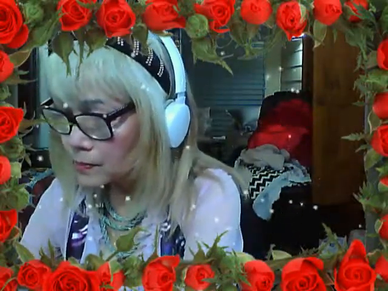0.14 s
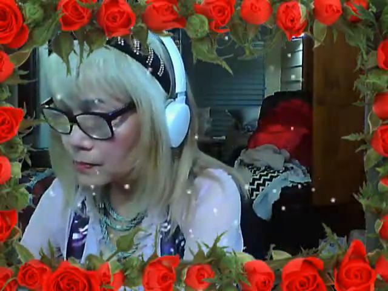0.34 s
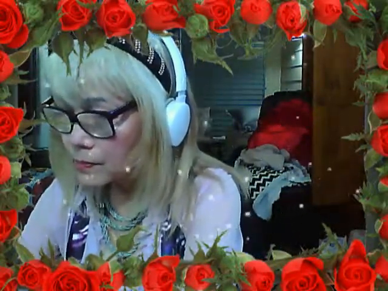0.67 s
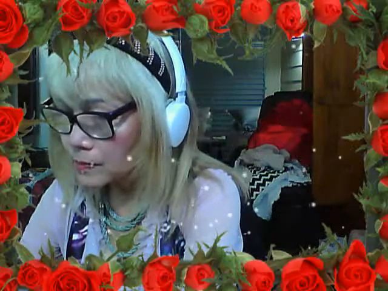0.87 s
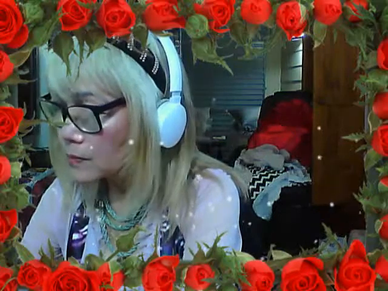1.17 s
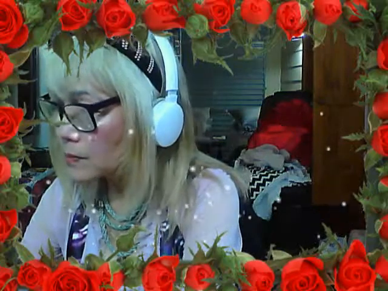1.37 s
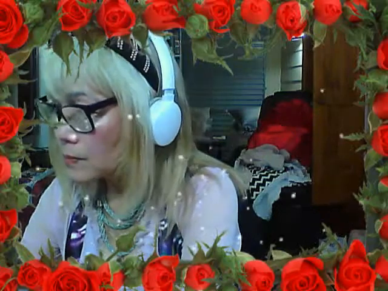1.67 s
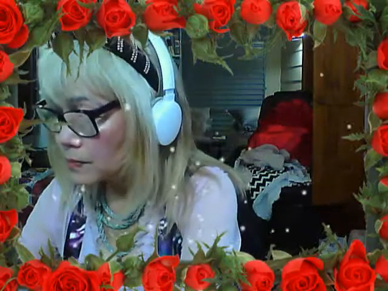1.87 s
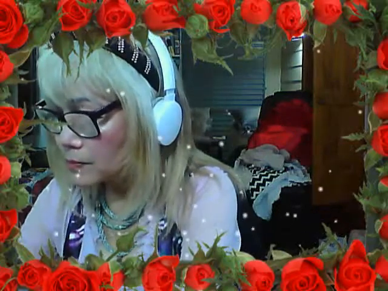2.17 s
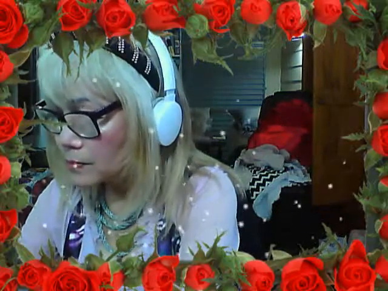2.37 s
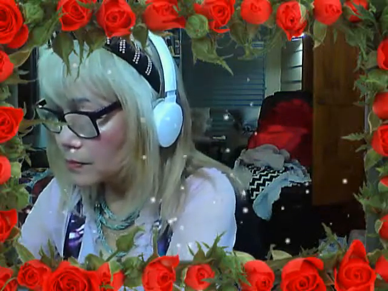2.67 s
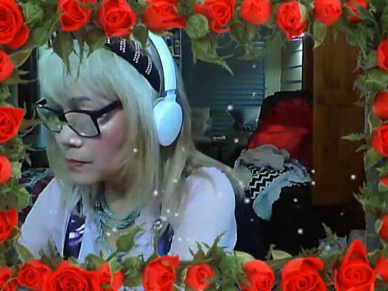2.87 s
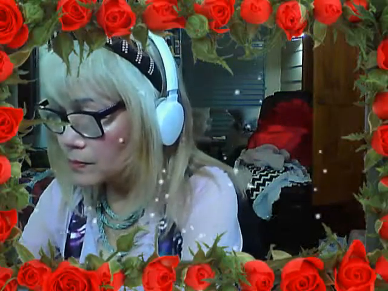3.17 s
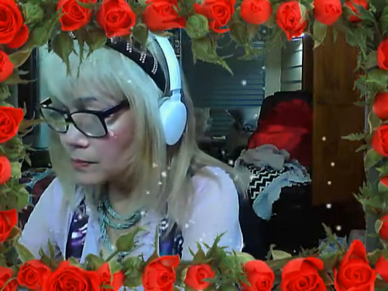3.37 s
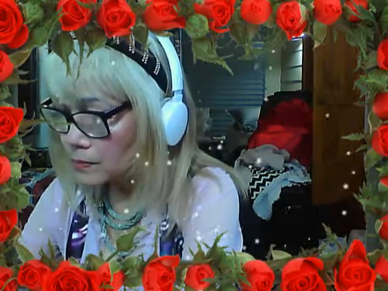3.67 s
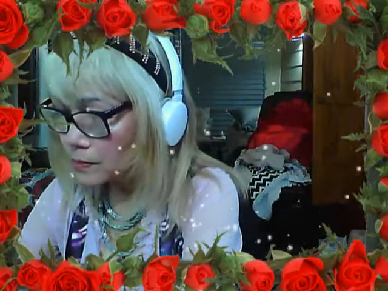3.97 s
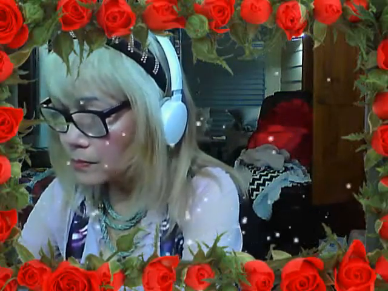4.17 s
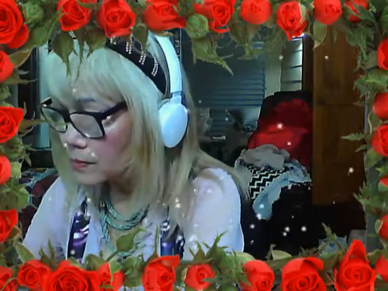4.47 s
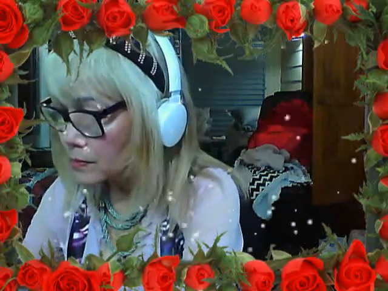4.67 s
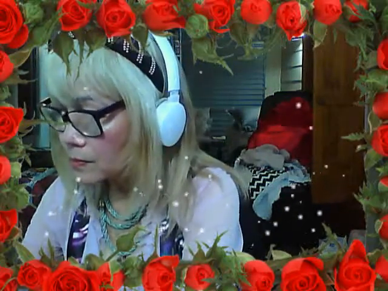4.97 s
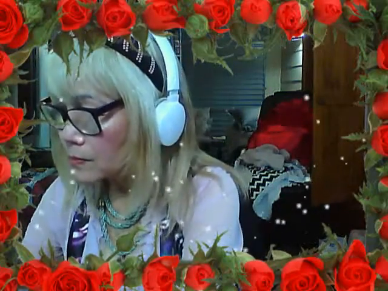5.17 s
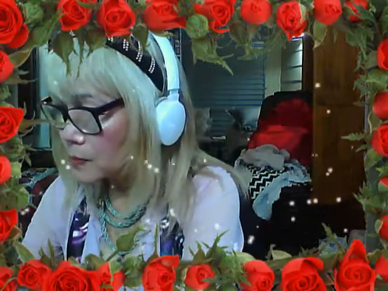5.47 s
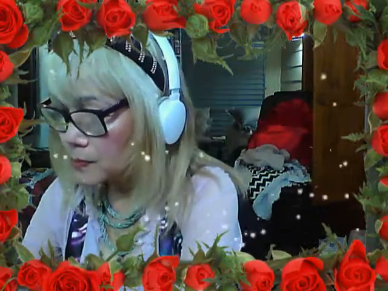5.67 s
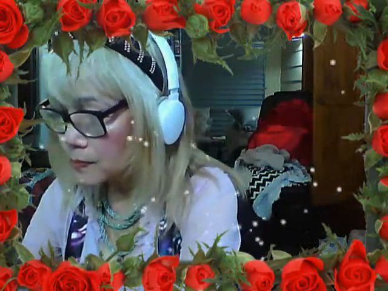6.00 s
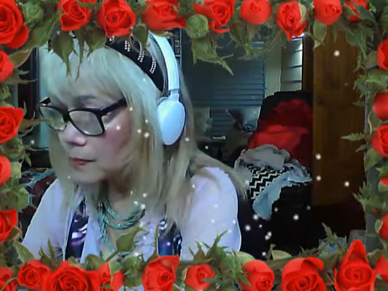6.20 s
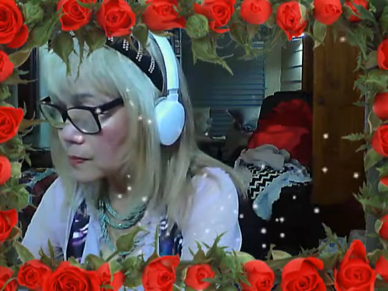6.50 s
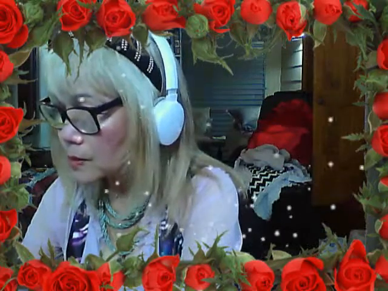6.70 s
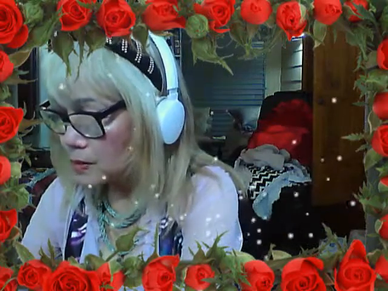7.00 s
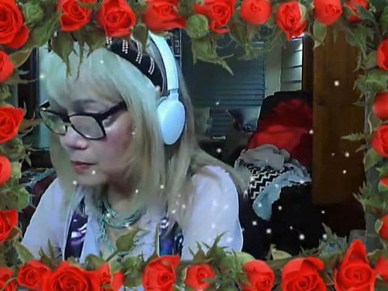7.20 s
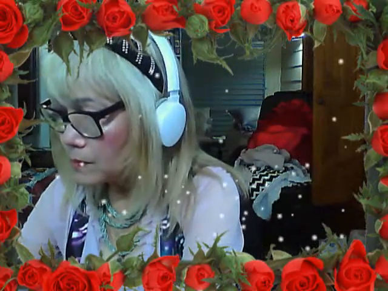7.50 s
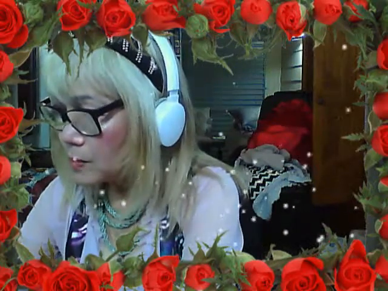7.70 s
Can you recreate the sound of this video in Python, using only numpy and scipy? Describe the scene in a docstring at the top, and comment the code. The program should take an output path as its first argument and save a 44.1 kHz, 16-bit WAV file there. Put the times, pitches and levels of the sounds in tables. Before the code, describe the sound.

Slow, uneven typing on a plastic computer keyboard, with louder space bar knocks, over a faint computer hum in a small room.

```python
"""Slow, uneven typing on a plastic computer keyboard, close to the microphone in a small room.
Each letter key clacks and thumps the desk; a big key, likely the space bar, knocks the hollow case
and clicks as it springs back. The near walls answer every stroke.
A computer hums underneath, and its fan speeds up near the end."""
import sys
import numpy as np
from scipy import signal
from scipy.fft import rfft, irfft, next_fast_len
from scipy.io import wavfile
from scipy.ndimage import map_coordinates

SR = 44100
rng = np.random.default_rng(int(sys.argv[2]) if len(sys.argv) > 2 else 0)


def inscribe(sig):
    """Save sig as 16-bit PCM at rate SR to the path in sys.argv[1].

    A 1-D sig is mono; a 2-D sig holds one channel per row.
    Samples are clipped to [-1, 1] before scaling.
    """
    pcm = np.round(np.clip(np.atleast_2d(sig).T, -1, 1) * 32767)
    wavfile.write(sys.argv[1], SR, pcm.astype(np.int16))


N = 346168


def amp(db):
    """Decibels to gain."""
    return 10 ** (np.asarray(db) / 20)


def along(points, hz):
    """Read a curve of (frequency, value) points on a log frequency axis."""
    freqs, values = np.transpose(points)
    return np.interp(np.log(hz + 1), np.log(freqs + 1), values)


def wobble(rate):
    """A smooth random curve, rate knots a second."""
    return map_coordinates(rng.standard_normal(int(N * rate / SR) + 4), [np.arange(N) * rate / SR])


def filtered(x, response):
    """Filter x by a gain that depends on frequency."""
    size = next_fast_len(N + SR // 2)
    return irfft(rfft(x, size) * response(np.fft.rfftfreq(size, 1 / SR)), size)[:N]


def noise(spectrum):
    """Coloured noise of rms 1."""
    x = filtered(rng.standard_normal(N), lambda hz: amp(along(spectrum, hz)))
    return x / np.sqrt(np.mean(x ** 2) + 1e-20)


def ring(spectrum, size=2048):
    """The causal impulse response of a body with this spectrum."""
    cepstrum = irfft(np.log(amp(along(spectrum, np.fft.rfftfreq(size, 1 / SR)))))
    cepstrum[1:size // 2] *= 2
    cepstrum[size // 2 + 1:] = 0
    return irfft(np.exp(rfft(cepstrum)))


def add(track, start_s, sound):
    """Mix a sound into the track."""
    start = max(round(start_s * SR), 0)
    track[start:start + len(sound)] += sound[:max(N - start, 0)]


# The small room's decay: frequency_hz, t60_s
ROOM_DECAY = [(150, 0.44), (1000, 0.17), (4000, 0.28), (10000, 0.26)]
def room(early_db=-9, late_db=-6, wall_s=.013, bounce_db=4, bounce_s=0.011):
    """The microphone hears scatter from the desk top, a rough bounce off the near wall, then the tail."""
    hz, frame_s, bins = signal.stft(rng.standard_normal(SR // 2), SR, nperseg=256)
    decay = amp(-60 * frame_s / along(ROOM_DECAY, hz)[:, None])
    tail = signal.istft(bins * decay, SR, nperseg=256)[1][:SR // 2]
    t = np.arange(len(tail)) / SR
    bounce = bounce_db * np.exp(-np.maximum(t - wall_s, 0) / bounce_s)
    return tail / np.linalg.norm(tail) * amp(np.where(t < wall_s, early_db, late_db + bounce))


# Disk drive and mains, faint in the background: pitch_hz, level_db
HUM_TONES = [(41.4, -61), (82.7, -71), (120.1, -54.5), (3338, -71.5), (3456, -81.5), (3639, -75),
             (4360, -78.5), (4479, -75.5), (5469, -76.5), (5766, -70.5)]
def computer_hum(waver_db=2.0):
    """The disk drive and mains give a low hum and a thin whine, each tone wavering a little."""
    t = np.arange(N) / SR
    drift = .5 * wobble(4)
    return sum(amp(db + waver_db * wobble(2.924)) * np.sqrt(2) * np.sin(2 * np.pi * hz * t + drift)
               for hz, db in HUM_TONES)


# The fan's tones as they leave the housing, at idle: frequency_hz, level_db
FAN_WHINE = [(103, -73.5), (207, -68), (305, -70), (330, -57), (414, -80), (517, -72.5), (625, -69.5),
             (724, -78), (828, -66.5), (858, -75), (886, -58.5), (931, -67), (1035, -74.5), (1340, -122),
             (1448, -64.5), (1655, -61.5), (1765, -62.5), (1862, -112), (1965, -69), (2068, -67.5),
             (2170, -86), (2480, -73.5)]
# Hiss at the vents: frequency_hz, relative_db
VENT_HISS = [(1000, -31), (1400, -10.5), (1650, -0.5), (2020, 0.5), (2200, -6.5), (2500, -8), (2850, -11.5),
             (3600, -8), (4700, -16), (5400, -12), (5900, -17), (8000, -19.5), (10400, -19.5), (11600, -32)]
# Low rush of the fan's air: frequency_hz, relative_db
AIR_RUSH = [(12, -29), (20, -17), (123, -6), (149, -11.5), (202, -14), (382, -14), (411, -15.5),
            (688, -20.5), (1400, -18), (1820, -51), (3080, -120)]
def fan(idle_hz=103.4, fast_hz=110.6, rise_start_s=6.55, rise_end_s=7.72, waver_db=3.0, flutter=0.000613):
    """Blade tones glide through the housing's resonances; tones and air grow louder with speed."""
    t = np.arange(N) / SR
    progress = np.clip((t - rise_start_s) / (rise_end_s - rise_start_s), 0, 1)
    blade_hz = idle_hz + (fast_hz - idle_hz) * np.sin(np.pi / 2 * progress) ** 2
    swell_db = 13 / (1 + ((t - 7.21) / 0.11) ** 2)  # the upper whine swells midway through the spin-up
    blade_phase = 2 * np.pi * np.cumsum(blade_hz * (1 + flutter * wobble(12))) / SR
    tones = np.zeros(N)
    for harmonic in range(1, 25):
        hz = harmonic * blade_hz
        level_db = np.interp(hz, *np.transpose(FAN_WHINE)) + waver_db * wobble(5)
        level_db += swell_db * np.exp(-((hz - 1600) / 380) ** 2)
        phase = harmonic * blade_phase + 2 * np.pi * rng.random() + 0.38 * wobble(25)
        tones += amp(level_db) * np.sqrt(2) * np.sin(phase)
    hiss = amp(-55.5 + 0.47 * wobble(9.8)) * noise(VENT_HISS)
    surge = filtered(hiss, lambda hz: (hz > 1400) & (hz < 2150)) * (amp(0.58 * swell_db) - 1)
    rush = amp(-54.5 + 0.9 * wobble(7.6)) * noise(AIR_RUSH)
    return (tones + hiss + surge + rush) * (blade_hz / idle_hz) ** 2.5


# Modes of the desk under the keyboard: pitch_hz, relative_db, t60_s
DESK_MODES = [(39.3, -8, 0.42), (74, -7, 0.4), (102.8, 4.5, .2), (122.9, -5.5, 0.26), (149, 8, 0.073),
              (174.6, 7.5, 0.093), (205.5, -1.5, 0.19), (249.5, -12.5, 0.18), (337.3, -11.5, 0.21),
              (442, -9, 0.084), (564, -13.5, 0.11)]
# The boom returning from the walls: delay_s, relative_db
WALL_ECHOES = [(.028, -11.5), (.066, -10)]
def desk_thump(track, start_s, deep_db, upper_db, rise_s=0.0012, scatter_db=2.16, split_hz=135):
    """The desk booms under a key; neighbouring modes start opposed, and wall echoes roughen the boom."""
    t = np.arange(SR // 2) / SR
    hz, mode_db, t60_s = np.transpose(DESK_MODES)[:, :, None]
    sign = (-1) ** np.arange(len(DESK_MODES))[:, None]
    strength, detune = rng.standard_normal((2, len(DESK_MODES), 1))
    force_db = np.where(hz < split_hz, deep_db + 1.0, upper_db - 0.5) + scatter_db * strength
    decay = amp(force_db + mode_db - 60 * t / t60_s)
    modes = sign * decay * np.sin(2 * np.pi * hz * (1 + 0.017 * detune) * t)
    boom = modes.sum(0) * (1 - np.exp(-t / rise_s))
    add(track, start_s, boom)
    for delay_s, db in WALL_ECHOES:
        add(track, start_s + delay_s, amp(db) * boom)


# The hollow inside the keyboard case: pitch_hz, relative_db, t60_s
HOLLOW_MODES = [(1219, 2, 0.034), (1413, -4, 0.034), (838, -10, 0.033)]
def hollow_knock(lead_s, rise_s=0.0019, room_db=-3):
    """The hollow of the case rings briefly and the room answers."""
    t = np.maximum(np.arange(SR // 2) / SR - lead_s, 0)
    modes = sum(amp(db - 60 * t / t60_s) * np.sin(2 * np.pi * hz * (1 + 0.042 * rng.standard_normal()) * t)
                for hz, db, t60_s in HOLLOW_MODES)
    direct = modes * (1 - np.exp(-t / rise_s))
    return direct + amp(room_db) * signal.fftconvolve(direct, room())[:len(t)]


def clack(body, rise_s, t60_s, lead_s, touch_db, room_db):
    """A light touch, then after lead_s a burst of plastic chatter and its diffuse echo."""
    t = np.arange(SR // 2) / SR
    since_s = np.maximum(t - lead_s, 0)
    force = (1 - np.exp(-since_s / rise_s)) ** 2 * amp(-60 * since_s / t60_s)
    force = force / force.max() + amp(touch_db) * (t < lead_s)
    burst = signal.fftconvolve(force * rng.standard_normal(len(t)), body)[:len(t)]
    echo = signal.fftconvolve(np.pad(room(), (round(lead_s * SR), 0)), body)[:len(t)]
    sound = burst / np.linalg.norm(burst) + amp(room_db) * echo / np.linalg.norm(body)
    return sound * np.sqrt(SR / 100)  # the burst has the energy of 10 ms at rms 1


# A usual keycap, heard close up: frequency_hz, relative_db
KEYCAP_SPECTRUM = [(1500, -71), (2350, -9.5), (2850, 0), (3300, 1), (3800, 4), (4500, 1), (5300, -1),
                   (5900, -7), (7100, -7.5), (8500, -22.5), (12000, -50)]
def keycap(pitch_hz, click_db, usual_hz=4000, ripple_db=3.0, dull_above_hz=5200):
    """Each cap has its own resonances; a light finger sounds mainly its pitch and spares the highest."""
    hz = np.geomspace(1500, 12000, 44)
    shape_db = along(KEYCAP_SPECTRUM, hz / (pitch_hz / usual_hz) ** 0.55)
    shape_db += ripple_db * rng.standard_normal(len(hz))
    lightness_db = max(-15.5 - click_db, 0)
    treble_loss = 0.28 * np.clip(np.log(hz / dull_above_hz) / 0.047, 0, 1)
    pitch_peak = 0.39 * np.exp(-(np.log(hz / pitch_hz) / 0.045) ** 2)
    return ring(np.column_stack([hz, shape_db + lightness_db * (pitch_peak - treble_loss)]))


# The plastic case, heard close up: frequency_hz, relative_db
CASE_SPECTRUM = [(150, -25.5), (400, 0), (650, 0.5), (900, -2.5), (1250, -1.5), (1600, -1), (1950, -3.5),
                 (2300, -3.5), (2800, -18), (5000, -43.5)]
# The keycap's sharp edge: frequency_hz, relative_db
EDGE_SPECTRUM = [(4000, -49), (6800, -9), (7800, -4), (9200, 0.5), (9700, -4.5), (10300, -1.5),
                 (10900, -18.5), (11600, -33.5)]
def key_contact(track, start_s, click_db, pitch_hz, case_db, edge_db, knock_db, lead_s=.005):
    """A contact sounds the case, the keycap, its edge and the hollow; hard strokes are the most abrupt."""
    softness = amp(.1 * (-12.5 - click_db))  # lighter clicks last longer
    case = clack(ring(CASE_SPECTRUM), 0.0015, 0.028, lead_s + 0.00033, touch_db=-18, room_db=4.5)
    cap = clack(keycap(pitch_hz, click_db), 0.0016 * softness, 0.015 * softness, lead_s - .0004,
                touch_db=-26.5, room_db=0)
    edge = clack(ring(EDGE_SPECTRUM), 0.00094 * softness, 0.012 * softness, lead_s - .0006,
                 touch_db=-15, room_db=-5.5)
    knock = hollow_knock(lead_s + 0.00114)
    plastic = amp(case_db + 2.5) * case + amp(click_db - 4.5) * cap + amp(edge_db - 1.0) * edge
    add(track, start_s - lead_s, plastic + amp(knock_db + 4.5) * knock)


# Keys springing back, the space bar loudest: start_s, click_db, pitch_hz
KEY_RELEASES = [(0.509, -38.5, 4230), (1.038, -37.5, 3620), (1.674, -31, 4350), (3.247, -28.5, 4050),
                (3.555, -51, 2200), (3.592, -53, 3920), (3.989, -42, 4630), (5.32, -28.5, 3970),
                (6.1, -48.5, 5140), (6.248, -52.5, 3950), (6.362, -47.5, 4430), (6.666, -34, 5300),
                (7.826, -52, 4020)]
def key_releases(usual_click_db=-29, lag_s=0.00513):
    """A rising key clicks thin and bright; only the harder returns shake the desk much."""
    track = np.zeros(N)
    for start_s, click_db, pitch_hz in KEY_RELEASES:
        key_contact(track, start_s, click_db, pitch_hz,
                    case_db=click_db - 18, edge_db=click_db - 3.5, knock_db=click_db - 11)
        thump_db = -35 + 1.9 * (click_db - usual_click_db)
        desk_thump(track, start_s + lag_s, deep_db=thump_db - 9.5, upper_db=thump_db)
    return track


# The space bar going down, loudest at the microphone: start_s, click_db, pitch_hz, edge_db
BAR_PRESSES = [(0.932, -14.5, 4340, -29.5), (1.588, -15, 4600, -26), (3.156, -17, 4200, -23.5),
               (5.237, -9, 4230, -22.5), (6.595, -23.5, 4600, -31)]
def space_bar(usual_click_db=-14.5, lag_s=0.0088):
    """The big key knocks the hollow case, then thumps the desk; both grow with its click."""
    track = np.zeros(N)
    for start_s, click_db, pitch_hz, edge_db in BAR_PRESSES:
        force_db = 0.66 * (click_db - usual_click_db)
        key_contact(track, start_s, click_db, pitch_hz,
                    case_db=force_db - 35, edge_db=edge_db, knock_db=force_db - 22)
        desk_thump(track, start_s + lag_s, deep_db=force_db - 36, upper_db=force_db - 36)
    return track


# Letter keys going down near the microphone: start_s, click_db, pitch_hz, knock_db, thump_db, lag_s
LETTER_PRESSES = [(0.055, -38.5, 3740, -47, -45.5, 0.017), (0.075, -51, 2860, -43, -55, .02),
                  (0.175, -33, 4300, -41.5, -46, 0.0098), (0.326, -36, 4250, -52, -37, 0.011),
                  (0.709, -32.5, 3500, -37, -30.5, 0.0082), (1.422, -25.5, 2500, -46, -42.5, 0.033),
                  (2.184, -29.5, 2740, -35.5, -35.5, 0.0053), (2.402, -50, 3950, -60, -41, 0.0027),
                  (2.74, -61, 3900, -83, -45, 0.012), (2.922, -36, 2740, -68, -35.5, 0.0056),
                  (3.428, -38.5, 2640, -69, -42, .025), (3.855, -31, 4100, -39, -33, 0.015),
                  (4.199, -26.5, 4000, -30, -29.5, 0.0051), (4.927, -34.5, 3920, -40.5, -42.5, 0.0022),
                  (5.81, -47.5, 3640, -72, -64, 0.0086), (7.746, -41.5, 3900, -56, -56, 0.011)]
def letter_keys(usual_knock_db=-39, brisk_lag_s=0.0042, deepen_db_per_s=140):
    """Each letter clacks, then thumps the desk; a slower press favours the desk's deep modes."""
    track = np.zeros(N)
    for start_s, click_db, pitch_hz, knock_db, thump_db, lag_s in LETTER_PRESSES:
        case_db = -45 + 0.31 * (knock_db - usual_knock_db)
        key_contact(track, start_s, click_db, pitch_hz, case_db, edge_db=click_db - 12, knock_db=knock_db)
        depth_db = deepen_db_per_s * (lag_s - brisk_lag_s)
        desk_thump(track, start_s + lag_s, deep_db=thump_db + depth_db, upper_db=thump_db - depth_db)
    return track


def scene():
    """Typing up close, the running computer underneath, in mono."""
    return (computer_hum() + fan() + key_releases() + space_bar() + letter_keys())[None]


def record(dry, ceiling=.92, top_hz=11650):
    """The microphone rounds off the tallest peaks and keeps nothing above its band limit."""
    rounded = dry[0] / (1 + np.abs(dry[0] / ceiling) ** 6) ** (1 / 6)
    return filtered(rounded, lambda hz: hz < top_hz)[None]


dry = scene()
out = record(dry)
inscribe(out)
```